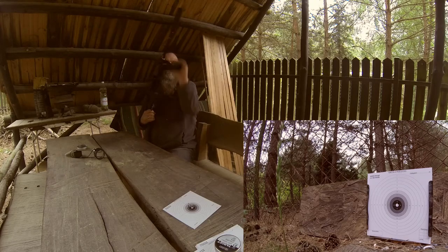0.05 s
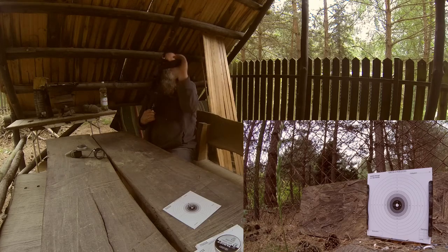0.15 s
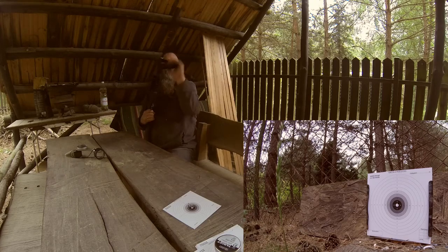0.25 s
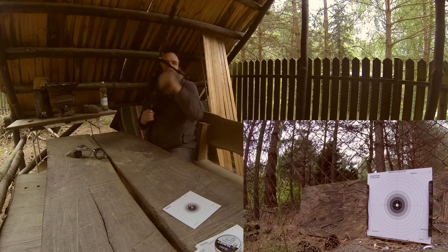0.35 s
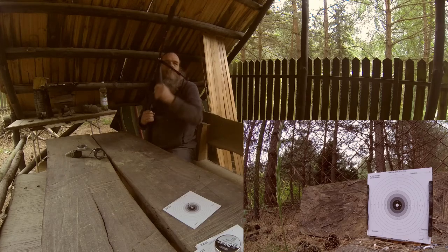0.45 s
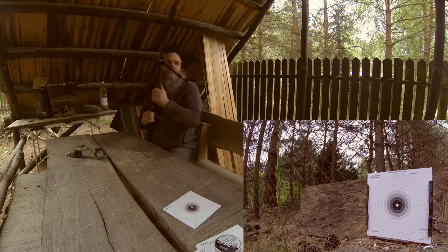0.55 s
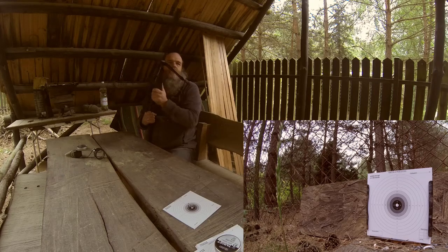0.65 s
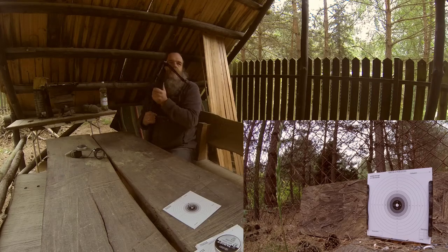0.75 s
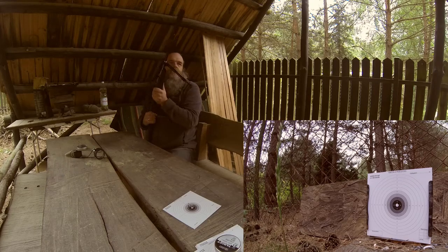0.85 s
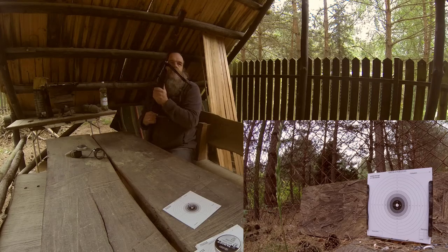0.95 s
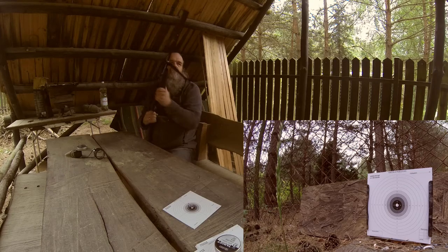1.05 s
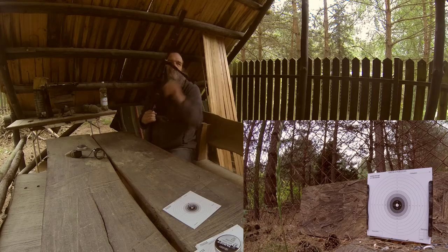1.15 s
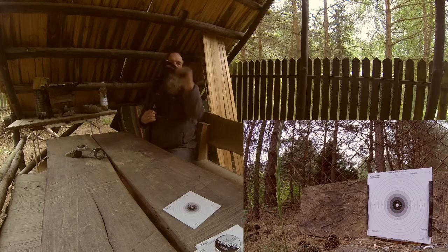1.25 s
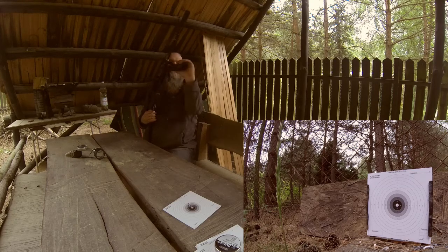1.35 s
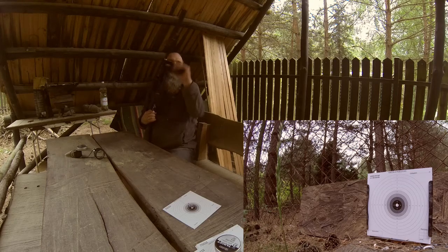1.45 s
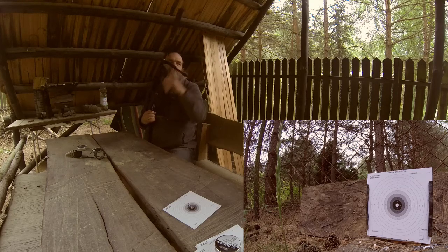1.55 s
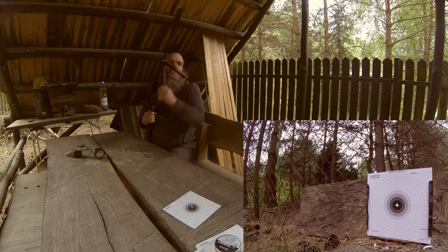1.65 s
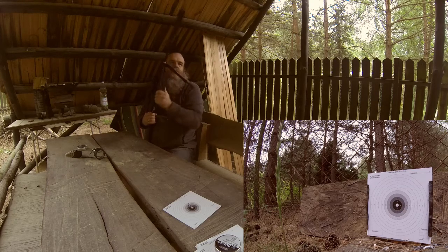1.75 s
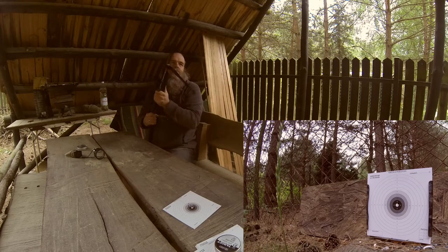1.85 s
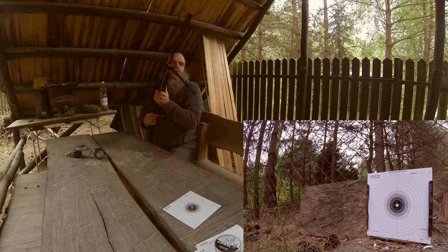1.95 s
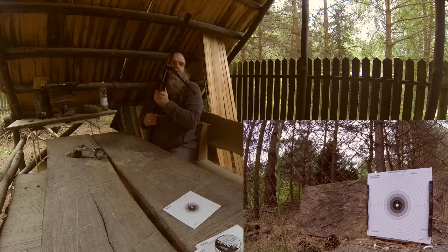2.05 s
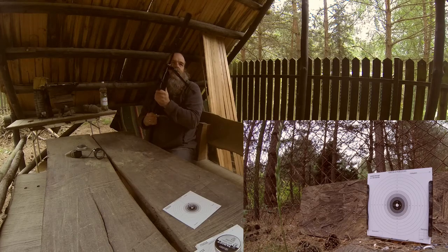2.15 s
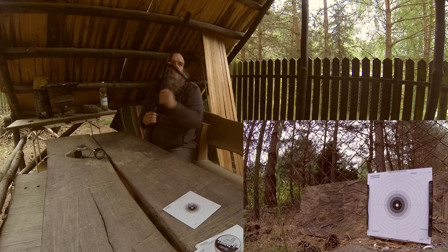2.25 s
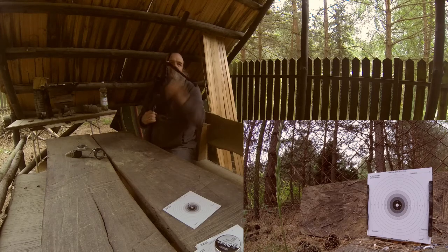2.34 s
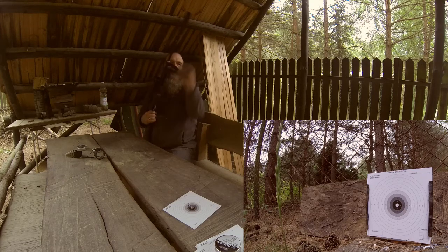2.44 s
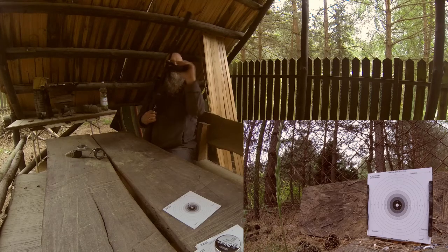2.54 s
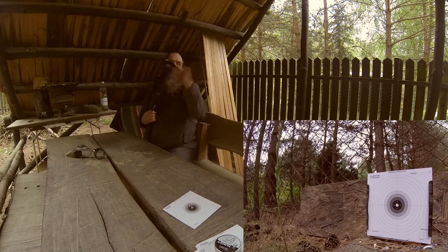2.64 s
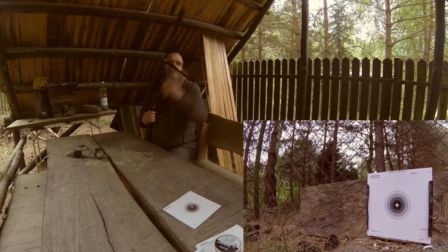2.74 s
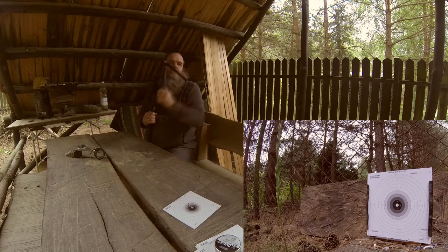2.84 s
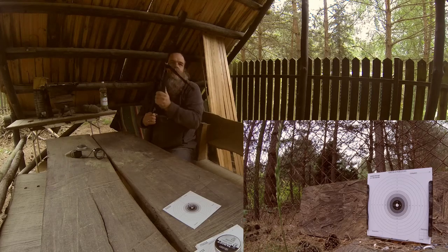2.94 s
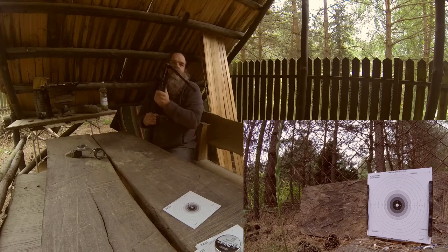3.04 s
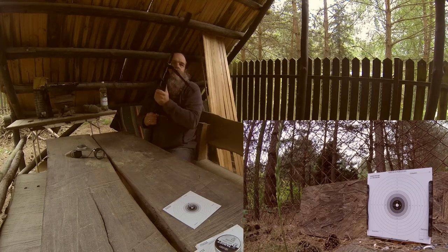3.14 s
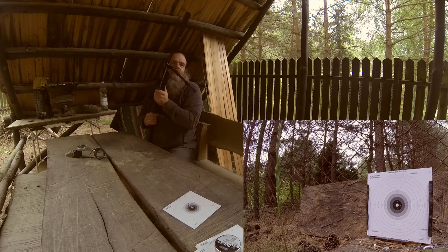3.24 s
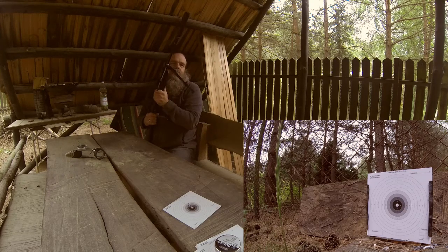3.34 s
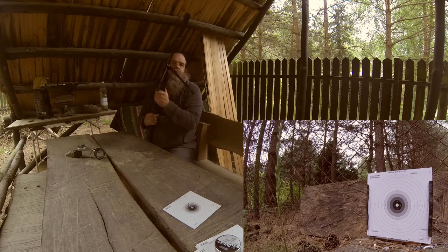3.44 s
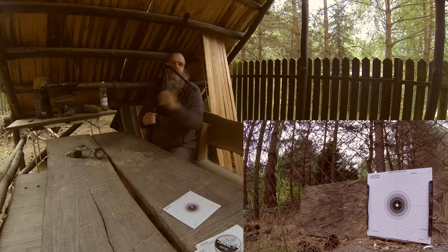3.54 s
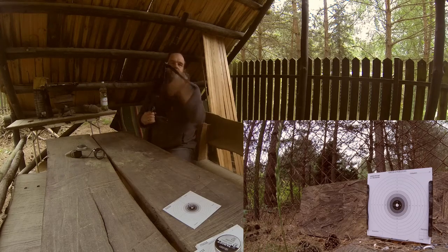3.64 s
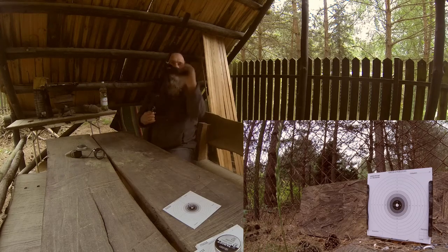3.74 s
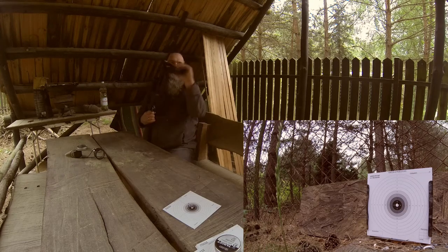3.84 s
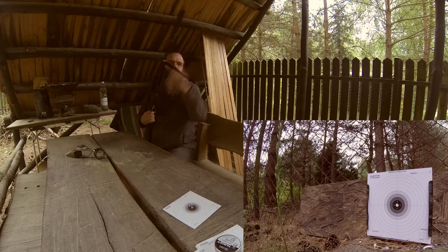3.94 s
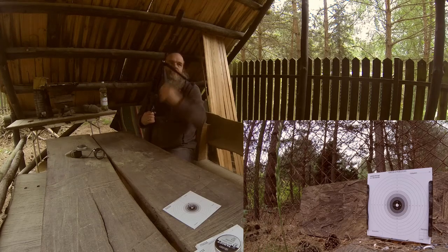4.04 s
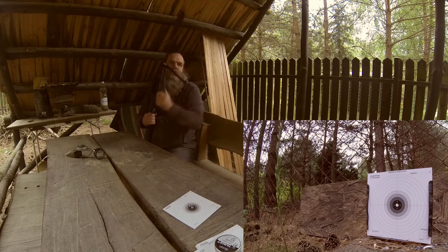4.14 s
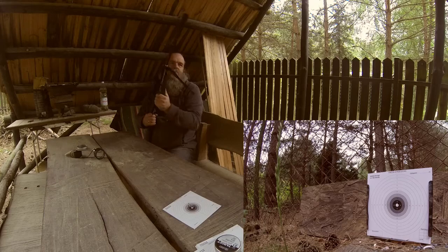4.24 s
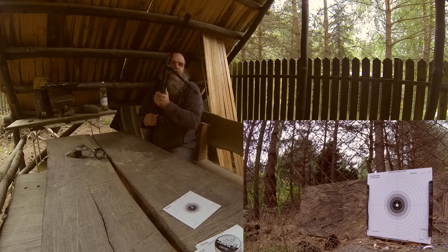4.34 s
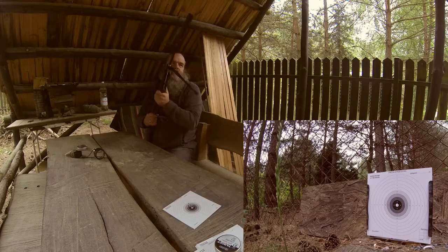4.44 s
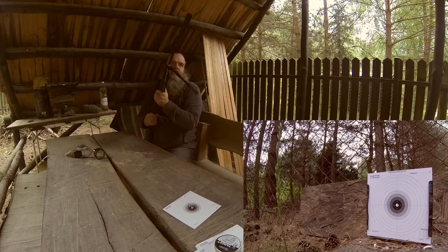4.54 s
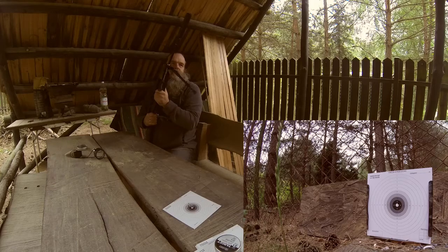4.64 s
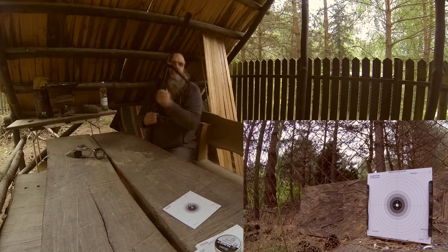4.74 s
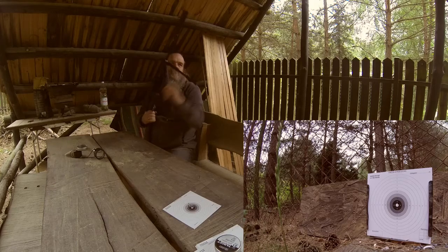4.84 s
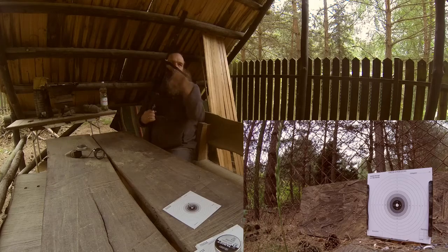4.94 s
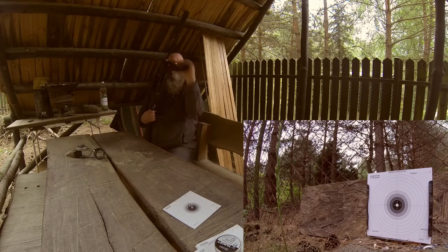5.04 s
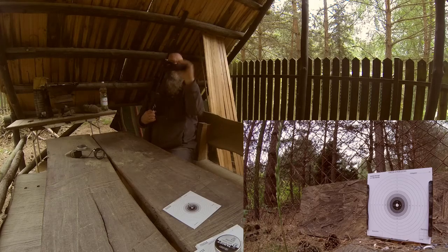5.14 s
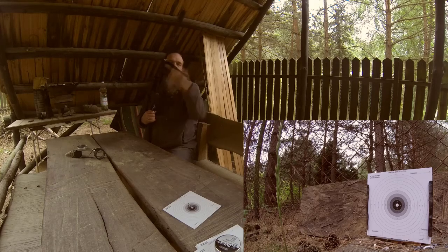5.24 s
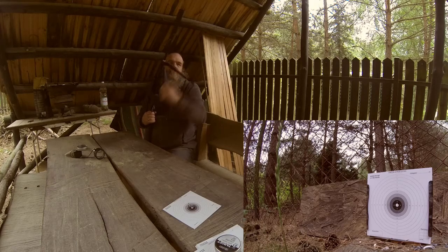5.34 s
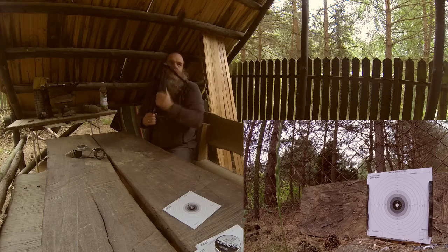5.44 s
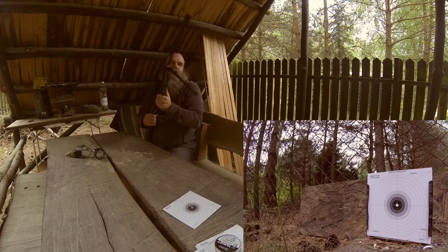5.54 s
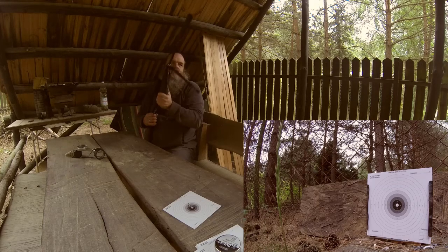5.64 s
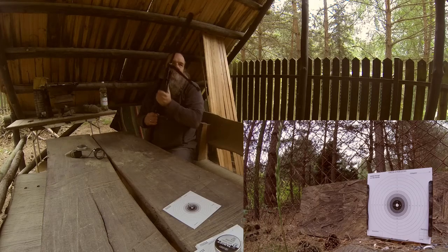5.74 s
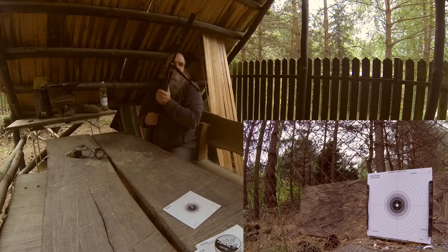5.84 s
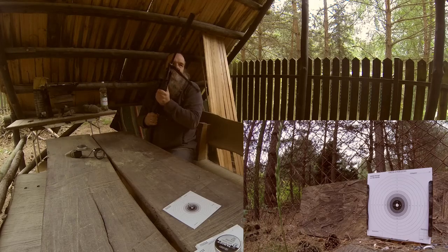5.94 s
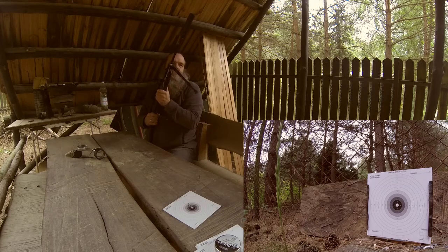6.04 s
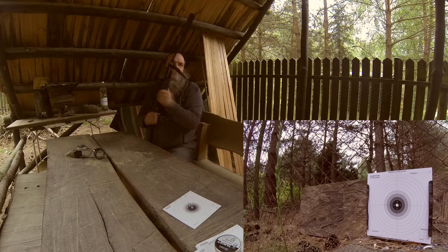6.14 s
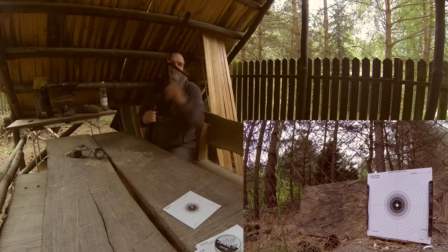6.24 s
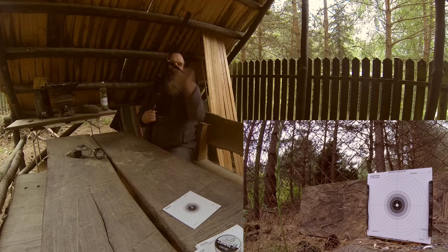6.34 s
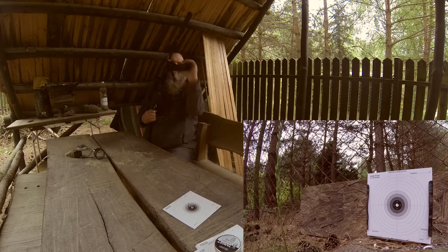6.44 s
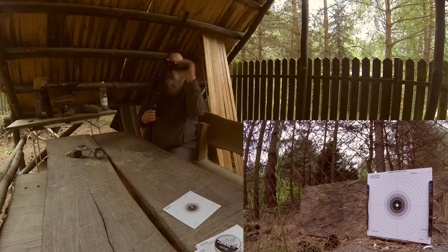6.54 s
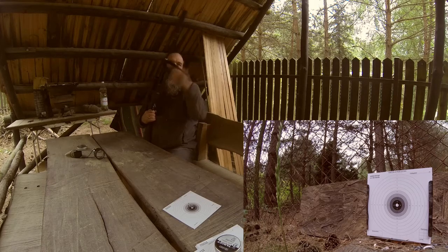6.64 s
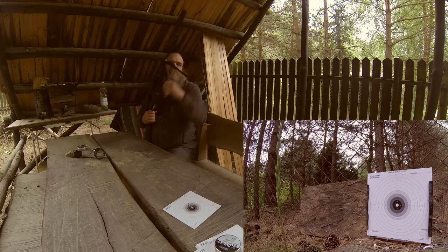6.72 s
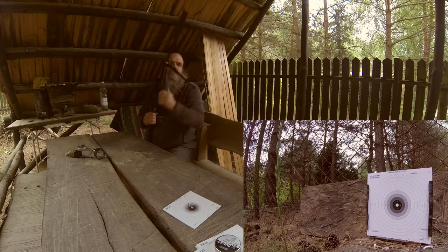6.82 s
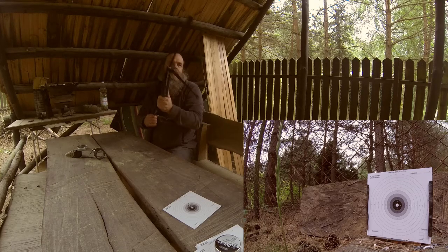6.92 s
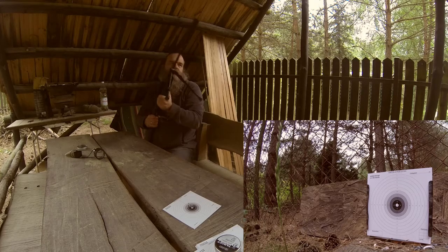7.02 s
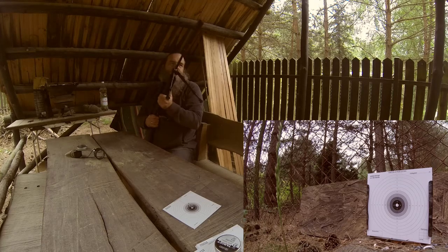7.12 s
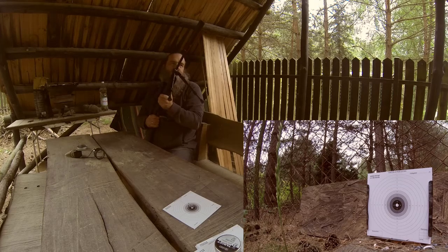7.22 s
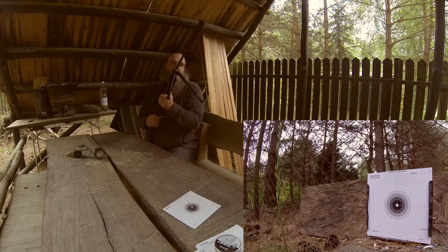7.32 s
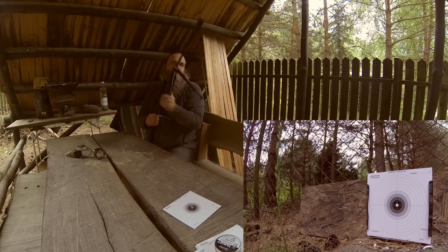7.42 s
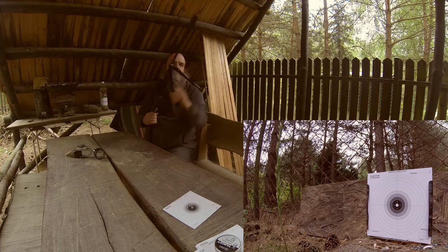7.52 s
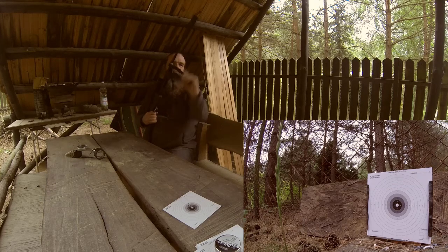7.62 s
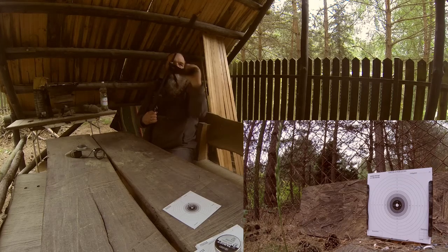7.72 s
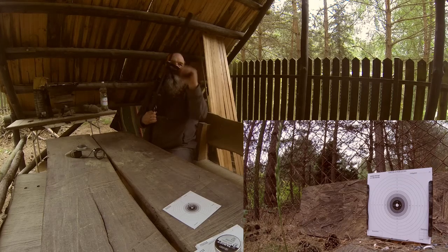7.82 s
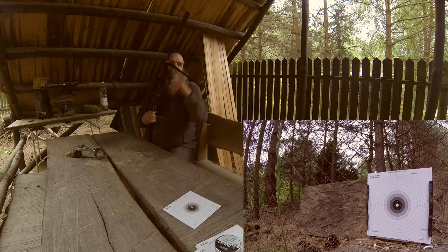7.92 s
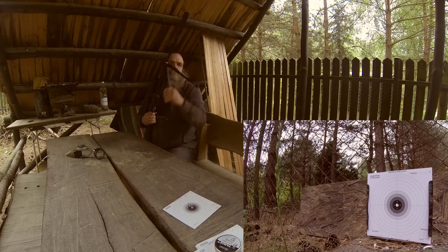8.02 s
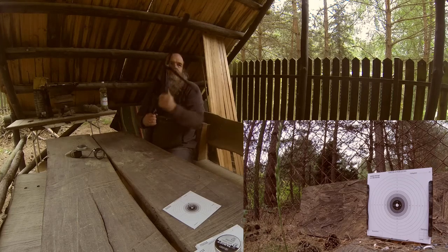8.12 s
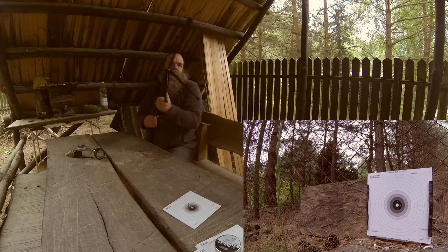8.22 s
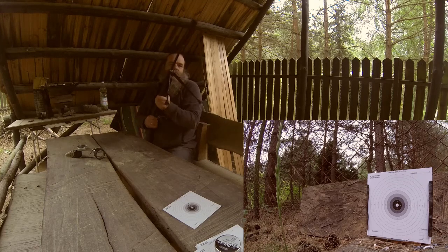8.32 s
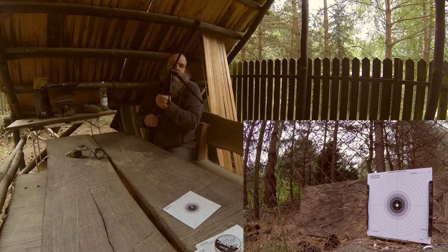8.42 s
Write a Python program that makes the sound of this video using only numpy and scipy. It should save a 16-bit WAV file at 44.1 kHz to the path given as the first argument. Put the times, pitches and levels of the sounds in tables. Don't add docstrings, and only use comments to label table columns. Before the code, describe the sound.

Soft, low-weighted forest wind and far traffic run throughout. At 0.1 s a small metal click marks a pump forearm reaching full opening; at 0.74 s it slaps shut, the softest of seven clacks. Others follow at 1.9, 3.1, 4.4, 5.8, 7.1 and 8.3 s: the third dull and dry, the fourth fuller, the fifth crackling sharply, the last hardest and most ringing. Each is a broad crack with a short hollow thud and brief stock-and-tube ring. Between slaps come much fainter clicks: a lift, catch release, linkage stop and sometimes piston turn, then a tiny touch just before closing; the 7.7 s stop stutters. Close bench and roof reflections are immediate, with faint later fence and trunk echoes. A raspy bird gives falling high chirps around 4.2-4.5 s. Very faint engines drone low from about 1 s, one swelling briefly near 3.5 s, the other slowing and fading by 7.8 s.

```python
import sys
import numpy as np
from scipy import signal
from scipy.io import wavfile

SR = 44100
rng = np.random.default_rng(int(sys.argv[2]) if len(sys.argv) > 2 else 0)


def rack_gain(trim_db):
    fader = np.asarray(trim_db, float)
    return 10 ** (fader / 20)


def pcm_store(signal):
    levels = np.round(np.clip(np.atleast_2d(signal), -1, 1) * 32767)
    wavfile.write(sys.argv[1], SR, levels.astype(np.int16).T)


N = 373791


def rms_one(x):
    return x / np.sqrt(np.mean(x ** 2) + 1e-20)


def band(x, low_hz, high_hz):
    sos = signal.butter(2, [low_hz, min(high_hz, 0.45 * SR)], "band", fs=SR, output="sos")
    return signal.sosfilt(sos, x)


def dying(t60, size):
    return rack_gain(-60 * np.arange(size) / SR / t60)


def drift(rate):
    r = np.exp(-80 * np.pi * rate / SR)
    slow = signal.lfilter([1], [1, -2 * r, r * r], rng.standard_normal(N // 40 + 2002))
    slow = rms_one(slow[2000:])
    return np.interp(np.arange(N) / 40, np.arange(len(slow)), slow)


def add(out, s, sound):
    i = round(s * SR)
    out[i:i + len(sound)] += sound[:len(out) - i]


def struck(modes, db_scatter, size=12000):
    t = np.arange(size) / SR
    chance = rng.normal(0, 1, len(modes))
    total = np.zeros(size)
    for (hz, db, t60), c in zip(modes, chance):
        total -= rack_gain(db + db_scatter * c) * dying(t60, size) * np.sin(2 * np.pi * hz * t)
    return total


# low edge f/Hz, high edge f/Hz
CLICK_BANDS = [(600, 1700), (1700, 3300), (3300, 5600), (5600, 14000)]


def tick(levels_db, t60, rattle_db=-15, lead_s=0.0007):
    contacts = rack_gain(rattle_db) * rng.standard_normal(3000) * dying(max(t60, 0.002), size=3000)
    lead = round(lead_s * SR)
    contacts[:lead] *= np.linspace(0.1, 1, lead)
    contacts[lead] = 1
    total = np.zeros(3000)
    for k, (edges, db) in enumerate(zip(CLICK_BANDS, levels_db)):
        part = (-1) ** k * band(contacts, *edges)
        total += rack_gain(db + 2.5) * part / np.max(np.abs(part))
    return total


# t/s, peak level/dB, crack level/dB, ring level/dB
SLAPS_SHUT = [
    (0.739, -13, 1, 0),
    (1.907, -10, 2, -2.5),
    (3.106, -7, -0.5, -8),
    (4.394, -8.5, 2.5, 0),
    (5.805, -7.5, 3, -2.5),
    (7.082, -6.5, 1.5, 0.5),
    (8.318, -5.5, 5, 4),
]
CRACK_COLOUR = [-17.5, -12.5, -10, -5.5]
# f/Hz, level/dB, t60/s
THUD_MODES = [(406, -22, 0.05), (570, -18, 0.022), (733, -6.5, 0.016), (950, -39, 0.0048),
              (1226, -17, 0.02), (1430, -13.5, 0.0067), (2660, -47, 0.0026), (4250, -18.5, 0.0095)]
# f/Hz, level/dB, t60/s
RING_MODES = [(550, -32, 0.1), (698, -22, 0.13), (744, -20.5, 0.17), (764.5, -28, 0.11), (819, -28, 0.15),
              (940, -36, .07), (1170, -22.5, 0.11), (1280, -21, .09), (1390, -28, .09), (1480, -29, 0.08),
              (1676, -28, 0.079), (1840, -31, 0.08), (2240, -33, 0.05), (4110, -31, .035)]
# f/Hz, level/dB, t60/s
HAND_THUMP = [(225, -36, .035)]


def slaps(contact_s=0.00004, small_body_hz=340, low_dip_hz=315):
    thud, ring = np.zeros(N), np.zeros(N)
    for s, db, crack_db, ring_db in SLAPS_SHUT:
        crack = tick(db + crack_db + np.array(CRACK_COLOUR), t60=0.0099, rattle_db=-19)
        add(thud, s + 0.0005, rack_gain(db) * struck(THUD_MODES, db_scatter=4.53, size=4000))
        add(thud, s - 0.0002, -crack)
        add(ring, s + 0.0007, rack_gain(db + ring_db) * struck(RING_MODES, db_scatter=0.0))
    soft = np.exp(-1 / (contact_s * SR))
    rounded = signal.lfilter([(1 - soft) ** 2], [1, -2 * soft, soft * soft], [thud, ring])
    radiates = signal.butter(4, small_body_hz, "high", fs=SR, output="sos")
    dip = signal.iirnotch(low_dip_hz, 4.0, fs=SR)
    thud, ring = signal.lfilter(*dip, signal.sosfilt(radiates, rounded))
    for s, db, *_ in SLAPS_SHUT:
        add(ring, s, rack_gain(db) * struck(HAND_THUMP, db_scatter=1.3, size=4000))
    return thud, ring


# t/s, level/dB, brightness/dB
HAND_LIFTS = [
    (1.058, -58, -4.5),
    (2.2253, -58, 1.5),
    (3.495, -56, 0.5),
    (4.7575, -54, 1),
    (6.1592, -54, -1),
    (7.448, -54.5, 0.5),
]
LIFT_COLOUR_DB, LIFT_RATTLE_S = [-0.5, -1, -6, -24], 0.046
# t/s, level/dB, brightness/dB
CATCH_RELEASES = [
    (1.1341, -45, 0.7),
    (2.2853, -46.5, -0.22),
    (3.5561, -47.5, -1.3),
    (4.8316, -42, 1.8),
    (6.235, -45, 1.5),
    (7.5198, -47.5, 1.4),
]
RELEASE_COLOUR_DB, RELEASE_RATTLE_S = [1, -1.5, -7.5, -7], 0.03
# t/s, level/dB, brightness/dB
LINKAGE_STOPS = [(0.0963, -47.5, -.5), (1.3269, -44.5, -0.5), (2.4948, -46, 0), (3.758, -46.5, 1.5),
                 (5.0563, -68, -2), (5.0627, -51, 0), (6.4358, -57, -1), (6.4395, -45.5, 0),
                 (7.7026, -61, 0), (7.7136, -51, -2), (7.7274, -57, -3), (7.766, -64, -3)]
STOP_COLOUR_DB, STOP_RATTLE_S = [-4.5, -3, -1, -6], 0.018
# t/s, level/dB,
# brightness/dB
PISTON_TURNS = [
    (1.4818, -58, 0.5),
    (5.1534, -72.5, 12.5),
    (6.6022, -57.5, -3),
    (7.8506, -54, -3),
    (8.288, -59, -6),
    (6.361, -61, 1),
    (0.27, -65, 1),
]
TURN_COLOUR_DB, TURN_RATTLE_S = [-9, -3, 2, -15], 0.0099
# t/s, ring level/dB, ring f/Hz, tick level/dB
CATCH_TOUCHES = [
    (0.696, -53, 1193, -60.5),
    (1.873, -53.5, 1373, -55.5),
    (3.077, -64, 1260, -61),
    (4.367, -62, 1290, -59.5),
    (5.781, -59, 1280, -55.5),
    (7.056, -58.5, 1160, -54.5),
    (8.3007, -50, 1170, -51.5),
]
# ratio to ring f, level/dB, t60/s
CATCH_RING = [(1.001, 12, 0.05), (1.1, -1.5, 0.023)]
CATCH_COLOUR = [6, -1.5, 6.5, -4]
# t/s, level/dB
PIN_RINGS = [
    (4.833, -68),
]
# f/Hz, level/dB, t60/s
PIN_RING = [(7680, 4, .05), (11900, -1, .03)]


def clicks(play_s=0.0018):
    out, steps = np.zeros(N), np.arange(4) - 1
    contacts = [
        (HAND_LIFTS, LIFT_COLOUR_DB, LIFT_RATTLE_S),
        (CATCH_RELEASES, RELEASE_COLOUR_DB, RELEASE_RATTLE_S),
        (LINKAGE_STOPS, STOP_COLOUR_DB, STOP_RATTLE_S),
        (PISTON_TURNS, TURN_COLOUR_DB, TURN_RATTLE_S),
    ]
    for rows, colour_db, t60 in contacts:
        for s, db, bright_db in rows:
            levels_db = db + bright_db * steps + np.array(colour_db)
            add(out, s - play_s, tick(levels_db, t60, rattle_db=-6, lead_s=play_s + 0.0007))
    for s, ring_db, ring_hz, tick_db in CATCH_TOUCHES:
        levels_db = tick_db + np.array(CATCH_COLOUR)
        modes = np.array(CATCH_RING) * [ring_hz, 1, 1]
        add(out, s - play_s, tick(levels_db, t60=0.046, rattle_db=-13, lead_s=2 * play_s))
        add(out, s + play_s, rack_gain(ring_db) * struck(modes, db_scatter=0.5, size=6000))
    for s, db in PIN_RINGS:
        add(out, s, rack_gain(db) * struck(PIN_RING, db_scatter=2, size=6000))
    return out


# delay t/s, level/dB
NEAR_REFLECTIONS = [(.0009, -37.5), (.0068, -20.5), (.0093, -9), (0.0099, -20.5), (0.017, -18.5)]
# f/Hz, level/dB, t60/s
SHELTER_SCATTER = [(475, -41, 0.055), (680, -8.5, 0.19), (1400, -4.5, 0.13), (2330, -6.5, 0.099),
                   (4840, 0.5, 0.092), (9700, 1.5, 0.025), (14300, 3.5, 0.1)]
# delay t/s, level/dB, low edge f/Hz, smear t60/s
FENCE_AND_TRUNKS = [(.04, -35.5, 554, 0.35), (0.063, -34, 2640, 0.11), (.104, -27.5, 6000, 0.019)]


def shelter(x, size=14000):
    response, t = np.zeros(size), np.arange(size) / SR
    response[0] = 1
    for s, db in NEAR_REFLECTIONS:
        add(response, s, rack_gain(db) * np.array([0.25, 0.5, 0.25]))
    builds = 1 - np.exp(-(t / 0.00066) ** 2)
    for hz, db, t60 in SHELTER_SCATTER:
        noise = rms_one(band(rng.standard_normal(size), hz / 1.45, hz * 1.45))
        noise = noise * np.sqrt(hz / SR / 200)
        response += rack_gain(db) * noise * builds * dying(t60, size)
    for s, db, low_hz, t60 in FENCE_AND_TRUNKS:
        smear = band(rng.standard_normal(size) * dying(t60, size), low_hz, 12000)
        add(response, s, rack_gain(db - 16.0) * smear)
    return signal.fftconvolve(x, response)[:N]


# t/s, length t/s, start f/Hz, end f/Hz, level/dB
BIRD_NOTES = [
    (4.191, 0.022, 6500, 6250, -74),
    (4.194, 0.025, 5650, 5350, -73),
    (4.288, 0.075, 7700, 7050, -67),
    (4.283, 0.1, 6900, 6400, -65.5),
    (4.446, .015, 6530, 5540, -64),
    (4.461, 0.094, 7630, 7060, -69),
    (4.48, 0.056, 6940, 6300, -70),
]


def bird(warble_hz=130, flutter_db=4.0, tail_db=-7, tail_t60=0.55):
    out = np.zeros(N)
    for s, length, start_hz, end_hz, db in BIRD_NOTES:
        t = np.arange(round(length * SR)) / SR
        rasp = [rms_one(band(rng.standard_normal(6000), 30, 250))[:len(t)] for _ in range(2)]
        pitch = start_hz + (end_hz - start_hz) * t / length + warble_hz * rasp[0]
        shape = rack_gain(db + flutter_db * rasp[1]) * np.sqrt(np.sin(np.pi * t / length))
        add(out, s, shape * np.sin(2 * np.pi * np.cumsum(pitch) / SR))
    trunks = rng.standard_normal(16000) * dying(tail_t60, size=16000)
    return out + rack_gain(tail_db) * signal.fftconvolve(out, trunks / np.linalg.norm(trunks))[:N]


# f/Hz, level/dB per Hz
FOREST_SPECTRUM = [(20, 2), (60, -2.5), (100, -3.5), (160, -7), (250, -11.5), (400, -13), (700, -17),
                   (1400, -20.5), (2600, -24), (5000, -30), (9000, -37.5), (12500, -41.5), (17000, -52)]


def forest(air_db=-60.5, patchy_db=0.87):
    out, together = 0, drift(1.5)
    edges = 20 * 2 ** np.arange(0, 10, 0.5)
    white = rng.standard_normal((2, N))
    hz, db = np.transpose(FOREST_SPECTRUM)
    for k, (low, high) in enumerate(zip(edges, edges[1:])):
        level_db = np.interp(np.log(low * high) / 2, np.log(hz), db)
        level_db = level_db + patchy_db * (0.25 * together + drift(10.4))
        out = out + rack_gain(level_db) * band(white[k % 2], low, high)
    return rack_gain(air_db) * rms_one(out)


# t/s, f/Hz, level/dB
SLOWING_ENGINE = [
    (0, 124, -93),
    (1, 115, -72),
    (1.9, 104, -72),
    (2.6, 95, -73),
    (3.4, 91, -66),
    (5.1, 91, -68),
    (5.9, 92, -63),
    (6.3, 84, -68),
    (7.1, 80, -67),
    (7.8, 78, -86),
]
# t/s, f/Hz, level/dB, half width t/s
SWELLING_ENGINE = (3.5, 130, -72, -0.4)


def drone(wobble_hz=1.9, flutter_db=2.5):
    t = np.arange(N) / SR
    wander = np.cumsum(wobble_hz * drift(4.1)) / SR
    flutter = rack_gain(flutter_db * drift(6.3))
    s, hz, db = np.transpose(SLOWING_ENGINE)
    turns = np.cumsum(np.interp(t, s, hz)) / SR
    first = rack_gain(np.interp(t, s, db)) * np.sin(2 * np.pi * (turns + wander))
    s, hz, db, width = SWELLING_ENGINE
    swell = rack_gain(db) * np.exp(-((t - s) / width) ** 2)
    return flutter * (first + swell * np.sin(2 * np.pi * (hz * t + wander)))


def scene():
    thud, ring = slaps()
    near = shelter(thud + clicks()) + ring
    return (near + bird() + forest() + drone())[None]


def roll_off(x):
    return signal.sosfilt(signal.butter(12, 15700, fs=SR, output="sos"), x)


def record(dry):
    dull = signal.sosfilt(signal.butter(10, 15000, fs=SR, output="sos"), dry)
    return roll_off(dull)


dry = scene()
out = record(dry)
pcm_store(out)
```